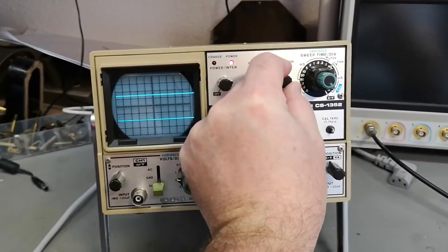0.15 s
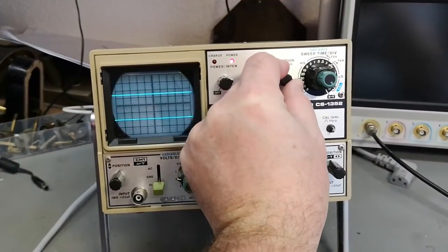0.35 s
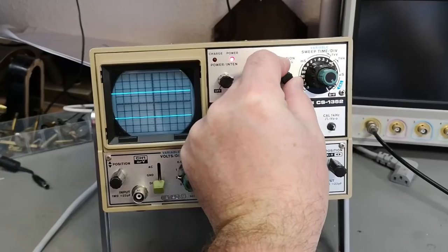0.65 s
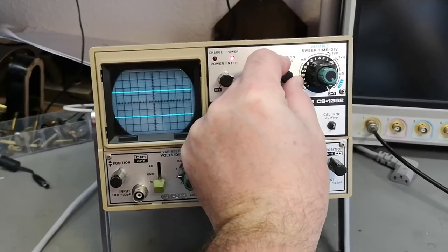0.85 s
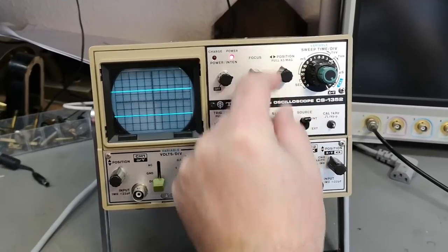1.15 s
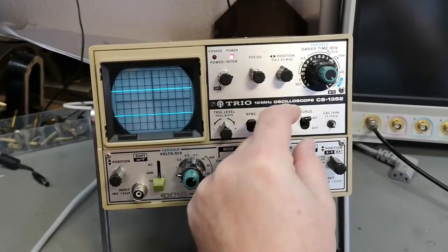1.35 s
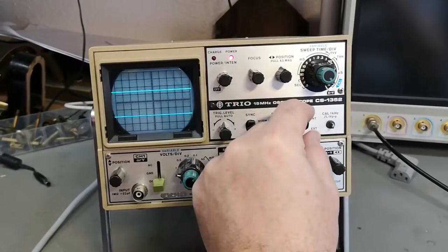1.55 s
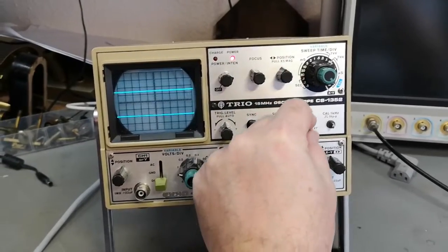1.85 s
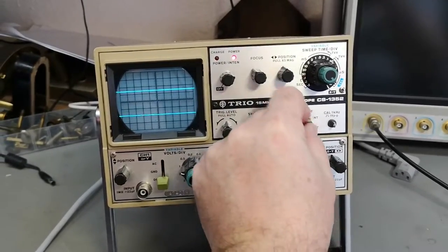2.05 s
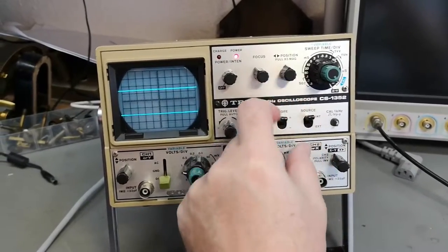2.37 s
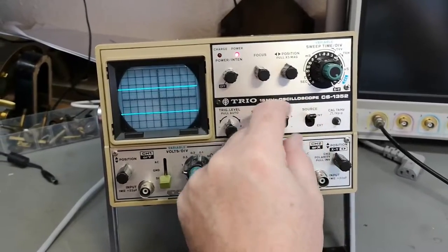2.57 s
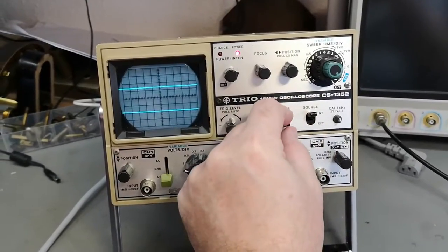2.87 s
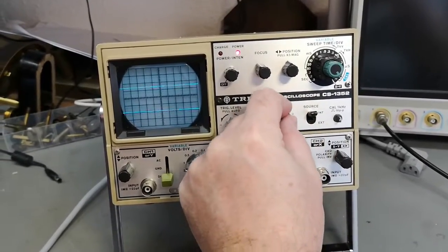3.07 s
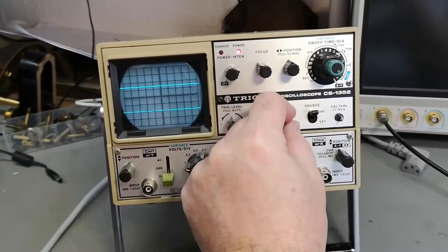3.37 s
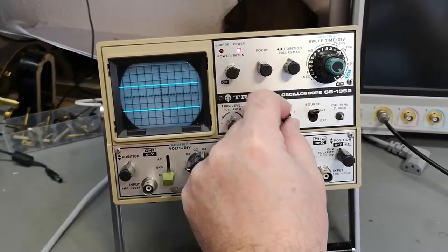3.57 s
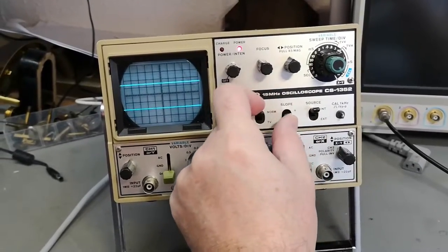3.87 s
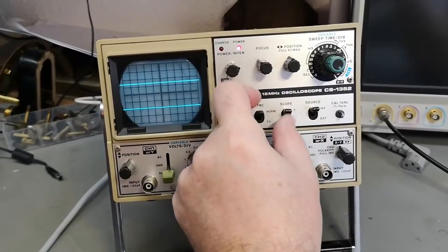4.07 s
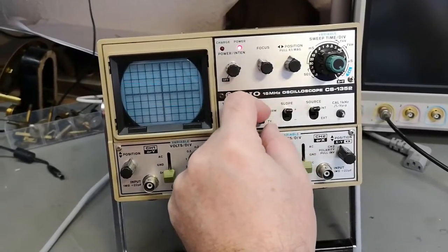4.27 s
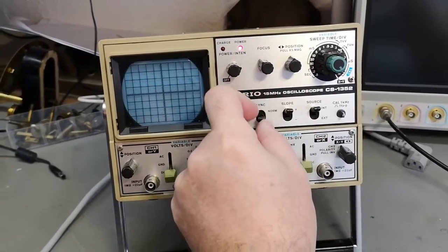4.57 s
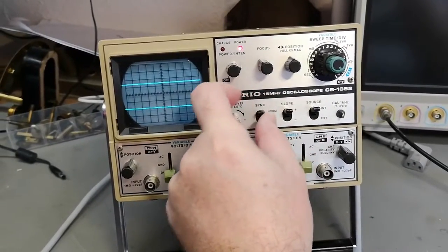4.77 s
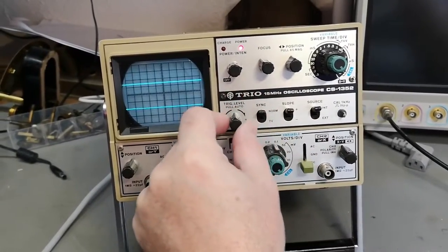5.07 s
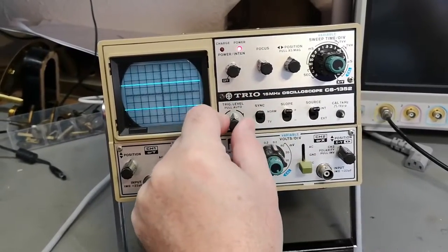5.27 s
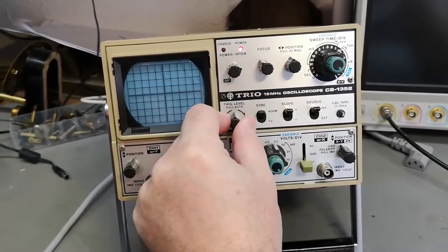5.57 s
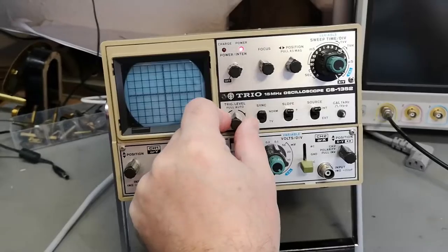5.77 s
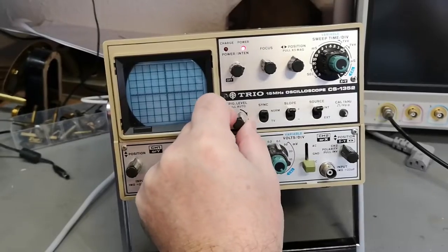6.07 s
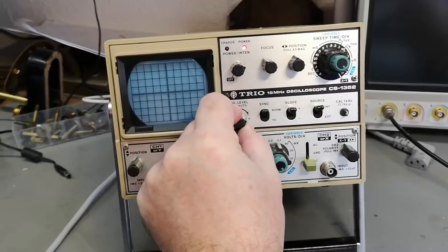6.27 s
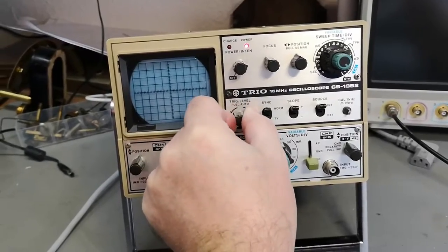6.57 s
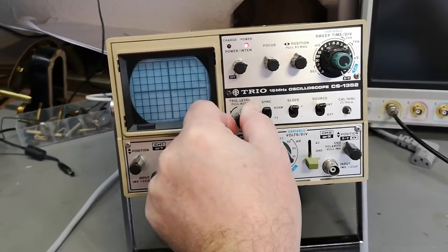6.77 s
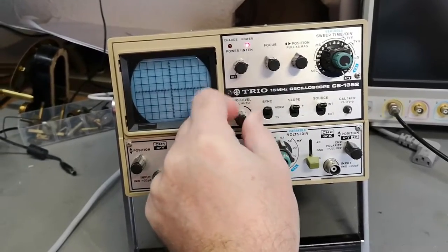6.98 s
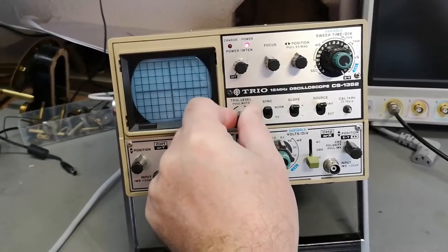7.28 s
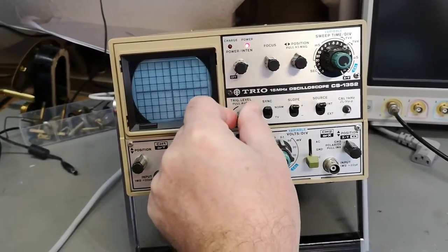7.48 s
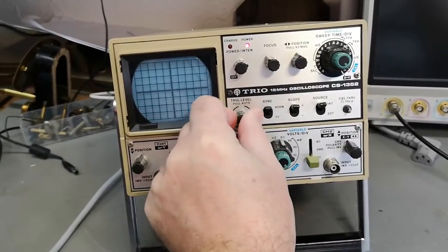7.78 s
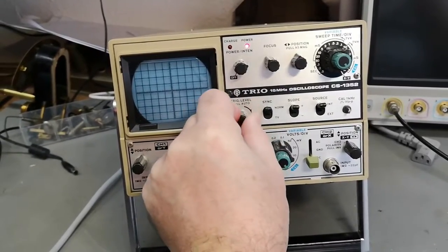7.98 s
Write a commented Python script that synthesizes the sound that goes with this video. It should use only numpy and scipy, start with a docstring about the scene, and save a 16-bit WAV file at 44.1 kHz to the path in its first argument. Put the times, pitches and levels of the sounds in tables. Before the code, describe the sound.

Close to a phone microphone, a hand works the switches of a metal-cased test instrument. Seven hard, bright snaps come irregularly, the second clearly loudest, each with a short metallic case ring and small room tail. Light plastic ticks and faint skin scrapes fill some gaps. Underneath lie very quiet hiss and low hum. After the last snap only tiny finger touches remain.

```python
"""A hand flips lever switches and a push-pull knob on the metal front panel of a bench instrument, close to a phone.
Each snap is a noisy chatter of a few milliseconds with one main blow, filtered by panel resonances; decaying
sines ring the case and rock the instrument, and a decaying noise tail answers as a small workshop.
Fingertips tick, drag and brush on the knobs as short filtered noises.
Transformer hum and a low drone are unsteady sines; rumble, room hiss and the phone's sway are shaped noise."""
import sys
import numpy as np
from scipy import signal
from scipy.fft import rfft, irfft, next_fast_len
from scipy.io import wavfile
from scipy.ndimage import uniform_filter1d, map_coordinates

SR = 44100
rng = np.random.default_rng(int(sys.argv[2]) if len(sys.argv) > 2 else 0)


def put_to_file(sound):
    """Save the sound as 16-bit audio at rate SR, in the file named by the first command-line argument."""
    columns = np.atleast_2d(sound).T  # one column per channel
    safe = np.clip(columns, -1, 1)
    whole_steps = np.round(safe * 32767)
    wavfile.write(sys.argv[1], SR, whole_steps.astype(np.int16))


N = 358533

# Steady bed. Rumble and hiss spectra. Each row: frequency in Hz, relative density in dB per Hz.
RUMBLE_SPECTRUM = [(24, -37), (40, -13.5), (70, -12.5), (100, -10), (130, -16.5), (250, -18), (275, -23),
                   (365, -17.5), (420, -24), (500, -37), (650, -60.5), (1100, -120)]
HISS_SPECTRUM = [(250, -38), (430, -6.5), (493, -4), (667, -2.5), (903, -1.5), (974, -3.5), (1050, -4),
                 (1460, -4), (1980, -1.5), (4160, -9.5), (6450, -13), (7280, -10.5), (9860, -18),
                 (15100, -20), (16000, -24.5)]
# Rumble fader. Each row: time in s, level in dB.
RUMBLE_FADER = [(0, -65), (.35, -70), (1.5, -70), (1.9, -69.5), (3.5, -69.5), (5.4, -70), (6.7, -68),
                (7.5, -70), (8.13, -66.5)]
# Likeness of the room noise at the two ports. Each row: frequency in Hz, left-right correlation (-1 to 1).
PORT_LIKENESS = [(60, 1), (130, 0.77), (290, 0.75), (640, -0.49), (1410, 0.41), (3100, -0.16), (6820, 0.25),
                 (15000, 1)]
# Transformer hum lines. Each row: frequency in Hz, rms level in dB before its wobble.
HUM_LINES = [(99.4, -68), (117.1, -75), (151.6, -78.5), (57.2, -74.5), (255.5, -84.5), (301, -85.5)]
# Low drone fader. Each row: time in s, rms level in dB.
DRONE_FADER = [(0, -85), (1.5, -82), (1.88, -58.5), (2.2, -76), (3.3, -70), (4, -65.5), (4.6, -74),
               (4.89, -60), (5.21, -55.5), (5.41, -73.5), (5.8, -55.5), (6.02, -65.5), (6.55, -58),
               (6.85, -67.5), (7.38, -65.5), (7.55, -71.5), (8.13, -75.5)]
DRONE_HZ = 33.8
HISS_DB, SWAY_DB, SWAY_SWING_DB = -74, -64.5, 4

# Fingertips dragging over knobs and levers; the first two and last two rows are faint tones and swells of the
# room noise. # Each row: start in s, end in s, note in Hz, note level in dB, panel level in dB, hiss level in
# dB.
SCRAPES = [(0, 0.098, 2070, -81, -76, -107), (.12, 0.212, 1190, -82.5, -95, -100),
           (1.746, 1.81, 4200, -71, -80, -78), (2.962, 3.045, 2630, -80, -68.5, -84),
           (3.256, 3.299, 2540, -69, -71, -70.5), (3.38, 3.43, 985, -73, -76, -91),
           (3.622, 3.66, 660, -78, -83, -82.5), (3.651, 3.715, 2300, -85, -75, -80),
           (4.131, 4.132, 3470, -75.5, -70.5, -88), (4.745, 4.824, 2320, -81, -77, -81),
           (6.361, 6.389, 1056, -68, -72.5, -79), (6.386, 6.423, 1040, -60.5, -60, -88),
           (6.509, 6.57, 1495, -83, -90, -87), (7.082, 7.097, 1050, -74.5, -88.5, -100),
           (7.136, 7.168, 1934, -70.5, -77, -100), (7.707, 7.74, 5630, -74, -95, -92),
           (7.97, 8.065, 1190, -81.5, -79, -101), (8.067, 8.128, 1190, -82, -73.5, -94)]

# Fingertip ticks on knobs and levers. Each row: time in s, level in dB, pitch in Hz, width of the note in octaves.
TICKS = [(0.284, -52, 2280, 0.62), (1.3394, -65, 2500, .6), (1.3938, -53.5, 1100, 0.39),
         (1.656, -47, 9100, 0.18), (1.7406, -35, 4570, 0.22), (1.7435, -43, 2250, .2),
         (1.7685, -51, 4500, .4), (1.7753, -53, 8540, .4), (2.23, -50, 3850, .3), (2.2324, -56, 2050, .2),
         (2.2544, -60, 4100, .2), (2.281, -61, 4100, .2), (3.0132, -51.5, 4200, .6),
         (3.022, -49, 4500, 0.46), (3.0302, -51.5, 4500, .5), (3.266, -45.5, 2680, 0.61),
         (3.272, -47, 2800, 0.68), (3.2835, -46, 3040, .7), (3.2957, -48.5, 4200, 0.73),
         (3.3398, -39.5, 6500, 0.44), (3.351, -40, 5800, 0.94), (3.3744, -44, 2320, 0.22),
         (3.386, -39, 2540, 0.22), (3.4037, -62, 1100, .4), (3.5652, -46.5, 2400, 0.8),
         (3.6095, -38.5, 4550, .8), (3.629, -48, 3800, .5), (3.634, -55, 3200, 0.39),
         (3.7167, -63, 4500, 0.54), (4.126, -59, 3500, 0.32), (5.474, -61, 3000, .5),
         (6.3608, -55, 2000, .9), (6.391, -55, 3200, 0.66), (6.403, -45.5, 3000, 0.9),
         (6.4143, -45.5, 3000, 0.99), (6.5554, -60, 1994, 0.79), (7.0912, -61, 1050, 0.39),
         (7.1412, -55.5, 1900, .4), (7.2387, -61, 1290, 0.45)]
# Basic colour of a tick. Each row: frequency in Hz, level in dB.
TICK_COLOUR = [(1000, -19), (2300, -16), (4500, -17), (8500, -18), (12500, -32.5)]
TICK_NOTE_DB, TICK_T60_S, TICK_PAN_DB = 12, .018, -6
# A fingertip runs over a knob's ribs. One row: start in s, end in s, ribs per second.
RIB_RUN = (3.667, 3.706, 140)
RIB_DB, RIB_HZ, RIB_OCTAVES = -57, 4200, 0.81

# Switch snaps. Each row: time in s, level in dB, left-right tilt in dB, slip ahead of the snap in s,
# slip level in dB, main blow against the chatter in dB, delay of the main blow in s, chatter t60 in s,
# thump against the snap in dB, shift of the low mids, of the treble and of the top octave in dB,
# low note in Hz and its lift in dB, middle note likewise, high note likewise,
# then the ring of each case part against the snap in dB.
SNAPS = [(1.8573, -17.5, -2, .0028, -31.5, 19, .0024, .036, -26, -11.5, 1.5, -1.5, 745, 15, 2650, 4.6, 6000, 3.3, -20.5, -30, -35, -33),
         (2.3329, -8.5, -3, .0036, -37, 22, 0.00067, .025, -40.5, -12.5, -0.5, 1.5, 1082, 2.8, 2100, 8, 4150, 6, -45, -40.5, -31, -39),
         (2.912, -18, -4.5, .019, -59.5, 13, 0.0018, .04, -32.5, -3, 1.6, 1.05, 1000, 6.6, 3460, 11, 7830, 7, -19.5, -30, -51, -39.5),
         (4.1592, -20.5, -5.5, .0042, -31, 20, .0006, 0.041, -51.5, 1, -0.2, 0, 1100, 6.6, 2250, 4.1, 4800, 7, -41, -17.5, -33.5, -46),
         (4.4830, -19.5, -6.5, .02, -56.5, 11.2, .0015, 0.027, -30.5, -7, 0.5, -1.7, 1400, 4, 2045, 7.9, 2540, 5.5, -31, -31.5, -42, -48),
         (4.8746, -22.5, -8.5, .0036, -34, 17.7, .0022, 0.04, -33, -3.5, -1.8, 2.4, 1040, 7, 2638, 7.3, 4860, 3.2, -38, -28, -36.5, -39),
         (5.6524, -17.5, -7, .016, -54.5, 23, .0012, 0.029, -32, -5, 6, -4, 1105, 11.4, 2850, 9.1, 6100, 8.3, -39.5, -31.5, -46, -51)]
# Basic colour of a snap. Each row: frequency in Hz, level in dB.
SNAP_COLOUR = [(720, -22), (1050, -27.5), (1500, -26.5), (2200, -25.5), (3500, -21), (5500, -17.5),
               (8000, -19.5), (9600, -21.5), (10600, -25.5), (12500, -33)]
NOTE_OCTAVES, SLIP_T60_S = .12, .035  # width of a snap's notes, decay of a slip
LOW_MID_HZ, TREBLE_HZ, TOP_OCTAVE_HZ = 1400, 6500, 10500  # top of the low mids, foot of the two upper bands
# Damped panel resonances. Each row: centre in Hz, width in Hz, relative level in dB.
PANEL_RESONANCES = [(1052, 110, -1), (1926, 170, 2.5), (2611, 310, -3.5), (3520, 210, -3.5),
                    (4143, 200, -7.5), (4920, 300, -4.5), (5460, 210, -8.5), (5840, 100, -4),
                    (6720, 230, -9), (7690, 350, -1.5), (9090, 190, -7.5), (9420, 110, -4),
                    (10130, 201.8, -11), (11200, 99, -18.5)]
# Lightly damped case modes. Each row: frequency in Hz, t60 in s, relative level in dB, name of the part.
CASE_MODES = [(641, .09, -1, "cover"), (2590, .12, 0.5, "cover"), (1040, 0.062, -1.5, "chassis"),
              (1350, .08, 0.5, "chassis"), (1925, .25, -0.5, "front plate"), (2050, 0.17, 0, "front plate"),
              (2125, 0.26, 1.5, "front plate"), (2306, 0.25, -3, "front plate"),
              (2380, .24, -3.5, "front plate"), (5310, .16, 0, "shields"), (5640, .3, 0.5, "shields")]
# Names of the case parts, in the order of a snap's ring levels.
CASE_PARTS = ["cover", "chassis", "front plate", "shields"]
# The instrument rocking on the bench. Each row: frequency in Hz, relative level in dB, t60 in s.
BENCH_MODES = [(55, -3.5, .2), (86, 0, .25), (126.5, 0.5, .2), (215, -12.5, .15), (308, -10, 0.19)]

# Panel as the two ports hear it. Each row: frequency in Hz, left-right level difference in dB.
PORT_BALANCE = [(60, 2.5), (110, -4.5), (200, -0.5), (380, 0), (700, 1.5), (1290, 0.5), (2380, -6),
                (4400, -9), (8120, -3), (15000, -9)]
# Phase between the ports. Each row: frequency in Hz, radians by which the left port leads.
PORT_LEAD = [(300, .1), (700, .5), (1200, .5), (2200, 1.6), (4200, 1.1), (8000, 1.6), (12000, 1)]
# Workshop decay. Each row: frequency in Hz, t60 in s.
SHOP_DECAY = [(500, 0.27), (1400, 0.21), (2200, 0.29), (3500, 0.23), (7500, 0.25), (13000, 0.29)]
# Workshop colour. Each row: frequency in Hz, relative level in dB.
SHOP_COLOUR = [(400, -8), (1000, 3.5), (1600, -0.5), (2150, 1), (2900, -5), (4000, -10), (5400, -7),
               (6300, -11.5), (7500, -2), (9300, -11), (10300, -14.5), (14000, -13.5)]

# Skin sliding on a knob. Each row: start in s, hold in s, hiss level in dB, body level in dB.
BRUSH_STROKES = [(7.722, .03, -64.5, -71), (7.93, .06, -82, -81)]
BRUSH_RISE_DB_PER_S, BRUSH_FALL_DB_PER_S, BODY_LAG_S = 452, 220, 0.02

LEAD_IN_S = .005  # silence ahead of the onset in every click
TOP_HZ = 15750  # upper band limit of the phone


def amp(db):
    """Gain of a level in dB."""
    return 10 ** (np.asarray(db) / 20)


def unit(x):
    """x at rms 1."""
    return x / np.sqrt(np.mean(x ** 2) + 1e-20)


def along(points, hz):
    """(Hz, value) points read on a log frequency axis."""
    f, v = np.transpose(points)
    return np.interp(np.log(hz + 1), np.log(f + 1), v)


def fader(rows):
    """A level per sample, in straight lines between (s, dB) rows."""
    s, db = np.transpose(rows)
    return np.interp(np.arange(N) / SR, s, db)


def wobble(rate):
    """A smooth random curve, rate knots a second."""
    knots = rng.standard_normal(int(N * rate / SR) + 4)
    return map_coordinates(knots, [np.arange(N) * rate / SR])


def filtered(x, response):
    """x shaped by a complex response of frequency."""
    m = next_fast_len(x.shape[-1] + 8192)
    spectrum = rfft(x, m) * response(np.fft.rfftfreq(m, 1 / SR))
    return irfft(spectrum, m)[..., :x.shape[-1]]


def bump(centre_hz, width_hz):
    """Response of one broad peak, placed between the ports."""
    return lambda hz: ports(hz) / (1 + ((hz - centre_hz) / width_hz) ** 2)


def ports(hz):
    """Level and phase difference between the two microphone ports, split evenly between them."""
    half = amp(along(PORT_BALANCE, hz) / 2) * np.exp(.5j * along(PORT_LEAD, hz))
    return np.array([half, 1 / half])


def panel(hz):
    """Damped resonances of the front panel, summed with alternating sign."""
    total = 0
    for k, (centre, width, db) in enumerate(PANEL_RESONANCES):
        peak = 1j * hz * width / (centre * centre - hz * hz + 1j * hz * width)
        total = total + (-1) ** k * amp(db) * peak
    return total


def shop(x, wet_db):
    """The workshop's answer: a fresh noise tail for each port, each frequency dying at its own speed."""
    hz, t, z = signal.stft(rng.standard_normal((2, len(x))), SR, nperseg=128)
    decay_db = -60 * t / along(SHOP_DECAY, hz)[:, None]
    tail = signal.istft(z * amp(along(SHOP_COLOUR, hz)[:, None] + decay_db), SR, nperseg=128)[1]
    tail = tail / np.linalg.norm(tail[0])
    late = np.pad(x, (round(0.0063 * SR), 0))[None]
    return amp(wet_db) * signal.fftconvolve(late, tail, axes=1)[:, :len(x)]


def coloured(points, notes, low_db=0, treble_db=0, top_db=0):
    """A colour with bell-shaped notes (Hz, dB, octaves) raised on it and its outer bands shifted."""
    hz = np.geomspace(points[0][0], points[-1][0], num=48)
    bells = sum(db * np.exp(-.5 * (np.log2(hz / note_hz) / octaves) ** 2) for note_hz, db, octaves in notes)
    above = lambda edge_hz: 1 / (1 + (edge_hz / hz) ** 10)
    low_shelf = low_db * (1 - above(LOW_MID_HZ))
    high_shelves = treble_db * above(TREBLE_HZ) + top_db * above(TOP_OCTAVE_HZ)
    return list(zip(hz, along(points, hz) + bells + low_shelf + high_shelves))


def click_time():
    """Seconds since the onset of a click, held at zero through the lead-in."""
    return np.maximum(np.arange(round(.4 * SR)) / SR - LEAD_IN_S, 0)


def click(db, pan_db, tint, t60, blow_db=16, delay=.0003, ring=0):
    """Uneven chattering contacts and a main blow shake the panel; heard directly and through the workshop."""
    u = click_time()
    contacts = rng.standard_normal(len(u)) * amp(4 * rng.standard_normal(len(u)))
    build_up = 1 - np.exp(-2 * u / max(delay, 1e-4))
    chatter = contacts * build_up * amp(-60 * u / t60)
    chatter[round((LEAD_IN_S + delay) * SR)] += amp(blow_db)
    # the colour falls away below its first point and above its last
    tint = np.array([(tint[0][0] * .6, tint[0][1] - 22)] + tint + [(16000, tint[-1][1] - 8)])
    # level follows the energy over one decay time
    size = lambda x: amp(db - 18.5) * x / np.sqrt(np.sum(x ** 2) / (t60 * SR))
    struck = filtered(chatter, lambda hz: (panel(hz) + 0.13) * amp(along(tint, hz)))
    body = size(struck) + amp(db) * ring
    # the walls hear the panel from all sides, which evens out its resonances and its colour
    even = np.c_[tint[:, 0], uniform_filter1d(tint[:, 1], size=9)]
    impulse = 1. * (u == u[u > 0][0])
    spread = size(filtered(impulse, lambda hz: amp(along(even, hz)))) + 0.3 * amp(db) * ring
    direct = amp([[pan_db / 2 + 3.5], [-pan_db / 2 - 1.0]]) * filtered(body, ports)
    return direct + shop(spread, wet_db=-7.0)


def add(out, s, x):
    """Mixes x into out so that the end of its lead-in lands at s."""
    at = round((s - LEAD_IN_S) * SR)
    out[:, at:at + x.shape[1]] += x


def rush(spectrum, patchy_db):
    """Stereo room noise of rms 1, patchy in time and frequency, its port likeness set by mid and side."""
    z = signal.stft(rng.standard_normal((2, N)), nperseg=512)[2]
    field = uniform_filter1d(rng.standard_normal(z.shape[1:]), size=8, axis=0)
    field = uniform_filter1d(field, size=16, axis=1)
    pair = signal.istft(z * amp(patchy_db * unit(field)), nperseg=512)[1][:, :N]
    turn = lambda hz: np.arccos(np.clip(along(PORT_LIKENESS, hz), -1, 1)) / 2
    mid, side = filtered(pair, lambda hz: amp(along(spectrum, hz)) * [np.cos(turn(hz)), np.sin(turn(hz))])
    return unit(np.array([mid + side, mid - side]))


def transformer_hum():
    """Sine lines whose level and phase drift slightly."""
    t = np.arange(N) / SR
    return sum(amp(db + 2.0 * wobble(12)) * np.sqrt(2) * np.sin(2 * np.pi * hz * t + 0.16 * wobble(1.0))
               for hz, db in HUM_LINES)


def low_drone():
    """A low sine with a drifting phase that swells and fades."""
    t = np.arange(N) / SR
    return amp(fader(DRONE_FADER)) * np.sqrt(2) * np.sin(2 * np.pi * DRONE_HZ * t + 0.69 * wobble(2.5))


def phone_sway():
    """The sway of the hand-held phone: noise mostly between 4 and 20 Hz at an unsteady level."""
    noise = filtered(rng.standard_normal(N), lambda hz: (hz > 4) / (1 + (hz / 20) ** 4))
    return amp(SWAY_DB + SWAY_SWING_DB * wobble(2.9)) * unit(noise)


def room():
    """Rumble and hiss in stereo; hum, drone and sway alike at both ports."""
    rumble = amp(fader(RUMBLE_FADER)) * rush(RUMBLE_SPECTRUM, patchy_db=0.4)
    hiss = amp(HISS_DB) * rush(HISS_SPECTRUM, patchy_db=1.7)
    return rumble + hiss + transformer_hum() + low_drone() + phone_sway()


def scrapes():
    """Grainy noise sounds a narrow note, the panel and a thin hiss: stick-slip of skin on plastic in most rows,
    faint tones and swells of the room noise at the start and end."""
    out = np.zeros((2, N + SR))
    for start, end, note_hz, note_db, panel_db, hiss_db in SCRAPES:
        t = np.arange(round((end - start + 0.17) * SR)) / SR
        stroke = np.clip(t / 0.0039, 0, 1) * amp(-60 * np.maximum(t - end + start, 0) / 0.05)
        grains = rng.standard_normal((3, len(t))) * amp(5 * rng.standard_normal((3, len(t))))
        note = unit(filtered(grains[0], bump(note_hz, 0.044 * note_hz)))
        body = unit(filtered(grains[1], lambda hz: ports(hz) * panel(hz) / (1 + (hz / 4500) ** 4)))
        hiss = unit(filtered(grains[2], bump(7600, 1300)))
        mix = amp(note_db) * note + amp(panel_db) * body + amp(hiss_db) * hiss
        add(out, start + LEAD_IN_S, stroke * mix)
    return out[:, :N]


def ticks():
    """Single fingertip ticks, and an uneven run of them over the ribs of a knob."""
    out = np.zeros((2, N + SR))
    start, end, rate = RIB_RUN
    ribs = [(s + rng.normal(0, 0.0009), RIB_DB + rng.normal(0, 1.5), RIB_HZ, RIB_OCTAVES)
            for s in np.arange(start, end, 1 / rate)]
    for s, db, hz, octaves in TICKS + ribs:
        tint = coloured(TICK_COLOUR, [(hz, TICK_NOTE_DB, octaves)])
        add(out, s, click(db, TICK_PAN_DB, tint, TICK_T60_S))
    return out[:, :N]


def case_ring(parts_db):
    """Decaying sine modes of the struck case; loose parts blur each mode's phase, the high ones most."""
    u = click_time()
    struck_db = dict(zip(CASE_PARTS, parts_db))
    rattle = 1.4e-5 * np.cumsum(rng.standard_normal((len(CASE_MODES), len(u))), axis=1)
    ring = 0
    for (hz, t60, level, part), shake in zip(CASE_MODES, rattle):
        build_up = 1 - np.exp(-u * hz / 5)  # over a few cycles
        decay = amp(struck_db[part] + level - 60 * u / t60)
        ring = ring + decay * build_up * np.sin(hz * (2 * np.pi * u + shake))
    return ring


def bench_thump():
    """Low decaying sines of the instrument rocking on the bench, eased in."""
    u = click_time()
    rock = sum(amp(level - 60 * u / t60) * np.sin(2 * np.pi * hz * u) for hz, level, t60 in BENCH_MODES)
    return rock[None] * (1 - np.exp(-u / .01))


def switches():
    """Each snap follows a slip of the lever, rings the case modes and thumps the instrument on the bench."""
    out = np.zeros((2, N + SR))
    thump = bench_thump()
    for (s, db, pan_db, ahead, slip_db, blow_db, delay, t60, thump_db, low_db, treble_db, top_db,
         hz1, db1, hz2, db2, hz3, db3, *parts_db) in SNAPS:
        notes = [(hz1, db1, NOTE_OCTAVES), (hz2, db2, NOTE_OCTAVES), (hz3, db3, NOTE_OCTAVES)]
        tint = coloured(SNAP_COLOUR, notes, low_db, treble_db, top_db)
        ring = case_ring(parts_db)
        add(out, s - ahead, click(slip_db, pan_db, tint, SLIP_T60_S, blow_db=8.5, delay=.001))
        add(out, s, click(db, pan_db, tint, t60, blow_db, delay, ring))
        add(out, s, amp(db + thump_db) * thump)
    return out[:, :N]


def brush():
    """Skin sliding over a knob: grainy noise in a bright band, with a duller band lagging behind."""
    t = np.arange(N) / SR

    def stroke(s, hold, db):
        """Rises to its level at s, holds, then falls, in straight dB slopes."""
        rise_db = BRUSH_RISE_DB_PER_S * np.maximum(s - t, 0)
        fall_db = BRUSH_FALL_DB_PER_S * np.maximum(t - s - hold, 0)
        return amp(db - rise_db - fall_db)

    grain = lambda: rng.standard_normal(N) * amp(1.5 * wobble(150))
    hiss = unit(filtered(grain(), bump(7440, 1100)))
    body = unit(filtered(grain(), bump(2310, 1070)))
    return sum(stroke(s, hold, hiss_db) * hiss + stroke(s + BODY_LAG_S, hold, body_db) * body
               for s, hold, hiss_db, body_db in BRUSH_STROKES)


def scene():
    """All sources at the two ports."""
    return room() + scrapes() + ticks() + switches() + brush()


def record(dry):
    """The phone keeps nothing above its band limit."""
    return filtered(dry, lambda hz: hz < TOP_HZ)


dry = scene()
out = record(dry)
put_to_file(out)
```